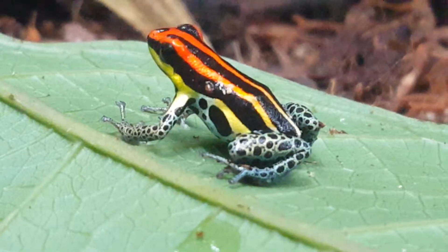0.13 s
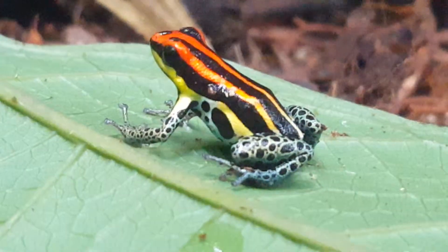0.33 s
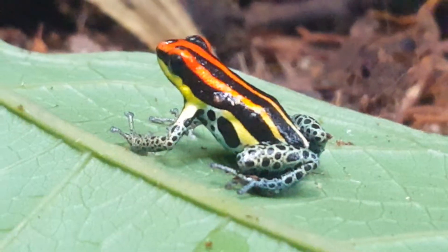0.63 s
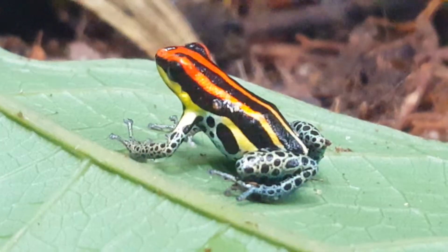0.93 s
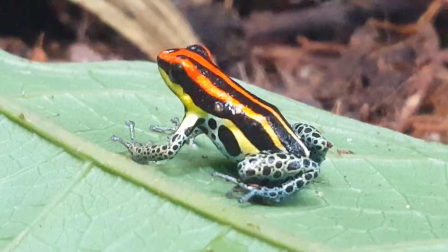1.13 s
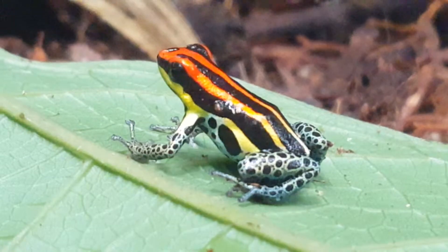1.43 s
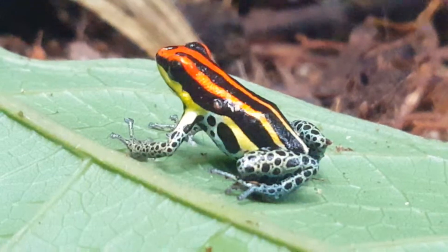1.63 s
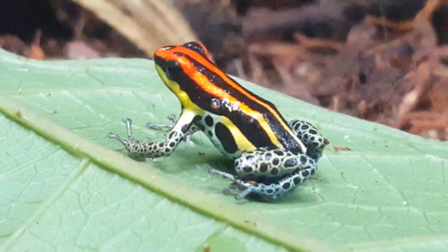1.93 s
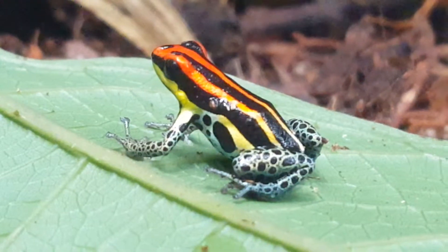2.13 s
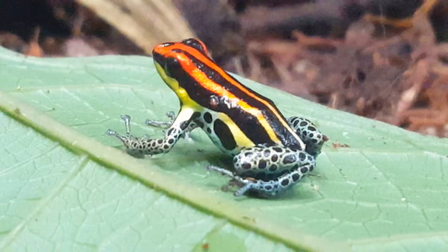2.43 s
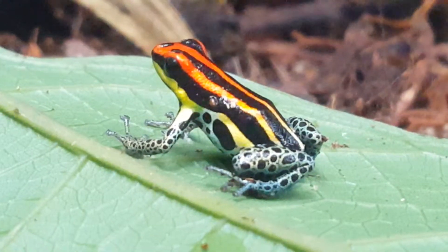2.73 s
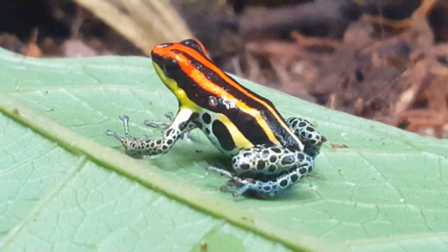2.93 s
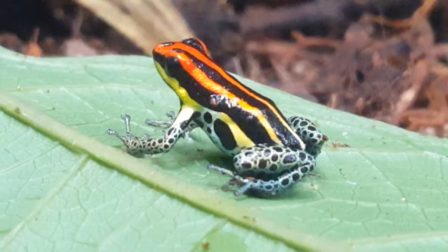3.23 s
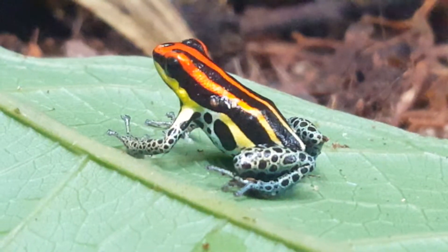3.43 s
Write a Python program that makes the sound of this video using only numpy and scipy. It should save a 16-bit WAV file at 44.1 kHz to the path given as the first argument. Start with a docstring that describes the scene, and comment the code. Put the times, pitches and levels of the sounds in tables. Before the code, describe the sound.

A cricket close on the left gives a shrill buzzing trill about once a second; two blurred distant crickets answer in the pauses, over throbbing higher insects, low breeze rumble on the right and small handling bumps.

```python
"""A humid forest, where a cricket close on the left trills once a second, each wing stroke a falling note.
Two farther ones answer, mostly in the pauses, as the same song blurred by leaves. Higher choruses of
short falling notes throb all round. A breeze, made of shaped noise, rumbles mainly on the right
microphone port and drops out twice after bumps; pulses and rough climbing tones are the small thumps
and scrapes of the handled camera."""
import sys
import numpy as np
from scipy import signal
from scipy.io import wavfile
from scipy.ndimage import uniform_filter1d

SR = 44100
rng = np.random.default_rng(int(sys.argv[2]) if len(sys.argv) > 2 else 0)


def output_pcm(signal):
    """Save a mono or channel-first signal as 16-bit PCM at the path in sys.argv[1].

    Samples are clipped to [-1, 1] before scaling.
    """
    pcm = np.clip(np.atleast_2d(signal).T, -1, 1) * 32767
    wavfile.write(sys.argv[1], SR, np.round(pcm).astype(np.int16))


def magnitude_from_level(level_db):
    """Linear magnitude for a level in decibels (20 dB per decade)."""
    exponent = np.asarray(level_db, float) / 20
    return 10 ** exponent


N = 157437  # length of the scene in samples


def evened(x):
    """Scales a sound to an average strength (rms) of 1."""
    return x / np.sqrt(np.mean(x ** 2) + 1e-20)


def slow(rate_hz, length):
    """Smooth random wander of rms 1, changing at about rate_hz: noise averaged twice."""
    width = max(int(SR / rate_hz), 1)
    once = uniform_filter1d(rng.standard_normal(length), width)
    return evened(uniform_filter1d(once, width))


def gate(t, start, end, edge_s=0.00085):
    """On between start and end, with short sloping edges."""
    return np.clip(np.minimum(t - start, end - t) / edge_s, 0, 1)


def foliage(x, t60):
    """Echoes among leaves: a random tail, unlike in each channel, that fades by 60 dB in t60 seconds."""
    t = np.arange(SR // 2) / SR
    build_up = np.minimum(t / 0.0093, 1)
    tail = rng.standard_normal((2, len(t))) * magnitude_from_level(-60 * t / t60) * build_up
    tail = tail / np.linalg.norm(tail[0])  # left tail has energy 1
    return signal.fftconvolve(np.atleast_2d(x), tail, axes=1)[:, :N]


def hiss_grid():
    """Log pitches (a column) and frame times in seconds, on which hiss() is shaped."""
    log_hz = np.log(np.fft.rfftfreq(512, 1 / SR) + 1)[:, None]
    return log_hz, np.arange(N // 128 + 5) * 128 / SR


def hiss(db):
    """Noise from random short-time spectra under db (channels, bins, frames), in dB per Hz."""
    a, b = rng.standard_normal((2, 2, N // 128 + 5, 257)).transpose(0, 1, 3, 2)
    spectra = a + 1j * b
    unit = signal.istft(spectra, nperseg=512, noverlap=384)[1].std() / np.sqrt(SR / 2)
    return signal.istft(spectra * magnitude_from_level(db), nperseg=512, noverlap=384)[1][:, :N] / unit


def air():
    """Steady forest air and recorder hiss: noise with a fixed tone colour and slight random patches."""
    # colour of the hiss: (pitch_hz, left_db_per_hz, right_db_per_hz)
    air_colour = [(25, -100, -100), (130, -96, -88), (506, -96, -98.5), (1030, -98.5, -100.5),
                  (2000, -98.5, -99), (3190, -102, -104), (4370, -105, -109), (6360, -95, -101),
                  (7900, -103, -105), (7900, -121, -121), (8300, -113, -113), (10200, -120, -120),
                  (11050, -114, -115), (11250, -109, -112), (12000, -111, -112), (16200, -115, -115)]
    patch_db = 2  # rms
    log_hz, t = hiss_grid()
    hz, left_db, right_db = np.transpose(air_colour)
    patches = uniform_filter1d(rng.standard_normal((len(t), 257)).T, 6, axis=0)
    patches = evened(uniform_filter1d(patches, 24, axis=1))
    sides = [np.interp(log_hz, np.log(hz), db) + patch_db * patches for db in (left_db, right_db)]
    return hiss(np.array(sides))


def breeze():
    """Lumpy wind pressure: low noise, unrelated between the ports, that drops away in the lulls."""
    # colour of the rumble before gusts and lulls: (pitch_hz, right_db_per_hz)
    breeze_colour = [(20, -79.5), (60, -69.5), (130, -72), (250, -77.5), (500, -82.5), (1000, -90),
                     (2000, -101), (4000, -120)]
    # lulls: (drop_s, starts_back_s, fully_back_s); the breeze returns from the top down
    lulls = [(.485, .67, .86), (1.865, 1.92, 2.08)]
    top_hz, bottom_hz, lull_db = 1500, 30, -20
    left_db, gust_db, lump_db = -14.5, .8, 1.2  # left is relative to right; gusts and lumps are rms
    log_hz, t = hiss_grid()
    lull = np.zeros((len(log_hz), len(t)))
    for drop, back, full in lulls:
        returned = np.maximum((t - back) / (full - back), 0)
        edge = np.log(top_hz) + np.log(bottom_hz / top_hz) * returned
        below_edge = 1 / (1 + np.exp(np.clip(1.8 * (log_hz - edge), -50, 50)))
        lull += np.clip((t - drop) / .012, 0, 1) * below_edge
    hz, db = np.transpose(breeze_colour)
    shape = np.interp(log_hz, np.log(hz), db, right=-150) + lull_db * lull
    rumble = hiss(np.array([shape + left_db, shape]))
    gusts = np.array([gust_db * slow(0.93, N) + lump_db * slow(79, N) for _ in range(2)])
    return rumble * magnitude_from_level(gusts)


def chorus(swells, rest_db, hz, spread_hz, right_db, count=40):
    """Many distant insects: short falling notes at random, swelling together."""
    note_s, notes_per_s, fall = 0.01305, 400, 0.075  # fall: share of the pitch lost over a note
    t, x = np.arange(round(note_s * SR)) / SR, np.zeros(N)
    for pitch in hz + spread_hz * np.linspace(-1.5, 1.5, count):
        turn = 2 * np.pi * pitch * t * (1 - fall * t / note_s / 2)
        note = np.sin(np.pi * t / note_s) * np.sin(turn)
        starts = rng.random(N) < notes_per_s / count / SR
        loudness = np.exp(-((pitch - hz) / spread_hz) ** 4 / 2)  # outlying pitches are fainter
        x += signal.oaconvolve(starts * loudness, note)[:N]
    t = np.arange(N) / SR
    level = magnitude_from_level(rest_db)
    for middle, length, db in swells:
        level = level + magnitude_from_level(db) * np.exp(-(2 * (t - middle) / length) ** 4)
    return level * evened(foliage(x, t60=0.14)) * magnitude_from_level(np.array([[0], [right_db]]))


def high_chorus():
    """A faint, higher chorus of the same kind of short falling notes."""
    # swells above the resting level: (middle_s, length_s, level_db)
    high_swells = [(.3, 0.46, -89), (1.25, 0.63, -87.5), (1.8, 0.21, -81), (2.45, 0.29, -80),
                   (3.3, 0.28, -80)]
    return chorus(high_swells, rest_db=-84, hz=9240, spread_hz=180, right_db=1.0)


def main_chorus():
    """The throbbing chorus, pitched above the near cricket, as short falling notes."""
    # swells above the resting level: (middle_s, length_s, level_db)
    main_swells = [(.03, 0.13, -58), (.33, 0.13, -55.5), (.55, 0.093, -68), (.71, 0.088, -63),
                   (1.08, 0.18, -70), (1.34, 0.19, -56.5), (1.64, 0.33, -69), (1.93, 0.12, -61.5),
                   (2.28, 0.16, -61), (2.6, 0.087, -61), (2.9, 0.25, -72), (3.15, 0.11, -64),
                   (3.38, .12, -60), (3.56, 0.13, -62)]
    return chorus(main_swells, rest_db=-64, hz=7572, spread_hz=306, right_db=-1.5)


def add(mix, s, sound, side):
    """Adds a sound to the nearer port, and faintly to the other."""
    far_port_db = -55
    away = np.clip(np.array([[1 + side], [1 - side]]) / 2, 0, 1)
    part = mix[:, round(s * SR):][:, :len(sound)]
    part += magnitude_from_level(far_port_db * away) * sound[:part.shape[1]]


def thumps():
    """Bumps on the camera body: each is one quick push and rebound."""
    # thumps: (middle_s, peak_db, pitch_hz, side from -1 left to 1 right)
    bumps = [(0.184, -33, 298, -0.84), (0.378, -36, 219, -1.15), (.424, -32.5, 322, 1),
             (0.4718, -38, 650, 0.86), (0.519, -42.5, 250, 0.86), (.549, -41.5, 348, 0.93),
             (0.5542, -44, 397, 0.96), (.615, -48, 130, 1), (0.625, -38.5, 130, 0.85),
             (1.304, -28.5, 240, -0.77), (1.832, -37, 200, 0.74), (1.8425, -34, 130, 1),
             (1.8495, -28, 125, 1), (3.554, -43, 403, -1.3)]
    cycles = .55  # time from the peak to where the pulse's outline falls to 1/e, in cycles
    out = np.zeros((2, N))
    t = np.arange(-.02, .02, 1 / SR)
    for s, db, hz, side in bumps:
        push = np.exp(-(t * hz / cycles) ** 2) * np.cos(2 * np.pi * hz * t)
        add(out, s - .02, magnitude_from_level(db) * push, side)
    return out


def scrapes():
    """Rubs on the camera body: a roughened tone whose pitch climbs, with grit in it."""
    # scrapes: (start_s, length_s, rms level_db, start_pitch_hz, side from -1 left to 1 right)
    rubs = [(0.469, 0.0147, -40.5, 700, 0.91), (.492, 0.0046, -44.5, 1010, 0.92),
            (0.498, 0.0044, -54, 1780, 0.62), (0.52, .003, -56, 1520, 0.75),
            (0.548, 0.011, -52.5, 2000, 0.84), (0.611, 0.0062, -53, 1500, 0.93),
            (0.616, 0.0066, -52.5, 1810, 0.88), (0.621, 0.0065, -53, 1390, 0.81),
            (1.844, 0.0174, -45.5, 478, 0.94), (1.858, .045, -57.5, 904, 0.87),
            (2.845, 0.0148, -51, 1291, -0.98), (3.459, 0.0057, -55.5, 930, -1),
            (3.535, 0.0028, -47, 2900, -0.87)]
    rise, rough_rate, grit_db = 2.2, 1.1, -6  # rise: end pitch / start pitch; rate x start pitch
    out = np.zeros((2, N))
    for s, length, db, hz, side in rubs:
        u = np.linspace(0, 1, max(round(length * SR), 8))  # progress through the scrape
        rough = uniform_filter1d(rng.standard_normal(3000), int(SR / (hz * rough_rate)))[:len(u)]
        grit = magnitude_from_level(grit_db) * evened(np.diff(slow(4500, 3000)))[:len(u)]
        tone = np.sin(2 * np.pi * np.cumsum(hz * rise ** u) / SR)
        outline = abs(np.sin(np.pi * u)) ** .3
        sound = outline * ((.8 + evened(rough)) * tone + grit)
        dull = signal.butter(4, min(5 * hz, 18000), fs=SR, output="sos")  # cuts the treble
        add(out, s, magnitude_from_level(db) * evened(signal.sosfilt(dull, sound)), side)
    return out


def wings(place, level, pitch=1):
    """Wing strokes: a gliding tone read from each place in the stroke cycle, with a faint octave."""
    # one wing stroke: (share of the period, pitch_hz, level_db)
    stroke = [(0, 5700, -28), (.06, 5860, -12), (.13, 5870, 1), (.27, 5840, 0), (.38, 5790, -2),
              (.5, 5720, -4), (.63, 5650, -1), (.8, 5580, -1.5), (.88, 5330, 0), (.93, 5000, -2),
              (.97, 4960, -8), (1, 4960, -28)]
    jitter, waver_hz, uneven_db = .012, 18, 2.0  # all rms; jitter in shares of a stroke
    octave_db, octave_fade_db_per_khz = -27, 5.5  # fades as the note falls from its highest pitch
    share, hz, db = np.transpose(stroke)
    place = place + jitter * slow(45, N)
    note = np.interp(place % 1, share, hz)
    turn = 2 * np.pi * np.cumsum(pitch * note + waver_hz * slow(66.8, N)) / SR
    size = level * magnitude_from_level(np.interp(place % 1, share, db) + uneven_db * slow(600, N))
    octave = magnitude_from_level(octave_db - octave_fade_db_per_khz * (hz.max() - note) / 1000)
    # the wing's own band
    band = signal.butter(3, [pitch * 4840, pitch * 6000], "bandpass", fs=SR, output="sos")
    return signal.sosfiltfilt(band, size * np.sin(turn)) + size * octave * np.sin(2 * turn)


def far_crickets():
    """Two singers of the same song, one a little higher and quicker, blurred by leaves."""
    # far trills: (start_s, end_s, level_db before blurring)
    answers = [(0.44, 0.956, -58.5), (1.295, 1.94, -55.5), (2.398, 3.012, -56.5)]
    # the singers: (pitch and speed as a multiple)
    singers = (1.06, 1.0)
    period_ms, dry_db, right_db = 19.9, -9, -9  # stroke period at speed 1
    t = np.arange(N) / SR
    level = sum(gate(t, start, end, 0.021) * magnitude_from_level(db) for start, end, db in answers)
    x = sum(wings(t * pitch * 1000 / period_ms, level, pitch) for pitch in singers)
    return (magnitude_from_level(dry_db) * x + foliage(x, t60=0.62)) * magnitude_from_level(np.array([[0], [right_db]]))


def near_cricket():
    """A lone stroke, a pause, then the trill swells; echoes beat against the falling notes."""
    # near trills: (first_stroke_end_s, end_s, stroke_period_ms, level_db before the swell and gain)
    trills = [(.0483, .558, 19.68, -40.5), (1.081, 1.579, 19.58, -40), (2.0865, 2.618, 19.68, -41),
              (3.111, 3.7, 19.64, -40.5)]
    # leaf and ground echoes, relative to the cricket: (delay_ms, left_db, right_db)
    echoes = [(2.1, -14, -24), (4.0, -14, -24), (6.7, -14, -25), (10.1, -13, -24)]
    first_s, lead_s = .013, .045  # short first stroke; how far ahead the lone stroke comes
    lead_db, swell_db, near_db = 0, 1, 0.5
    right_db, wet_left_db, wet_right_db = -27, -.5, -8
    t, place, level = np.arange(N) / SR, np.zeros(N), np.zeros(N)
    for first, end, ms, db in trills:
        lead = first - lead_s
        trill = gate(t, first - first_s, end, .004)
        lone = gate(t, lead - first_s, lead + .002, .004)
        since = np.where(trill > 0, t - first, np.where(lone > 0, t - lead, 0))
        place += since * 1000 / ms
        swell = swell_db * np.clip((t - first) / .5, 0, 1)
        level += trill * magnitude_from_level(db + swell) + lone * magnitude_from_level(db + lead_db)
    x = wings(place, level)
    taps = np.zeros((2, SR // 20))
    taps[:, 0] = 1, magnitude_from_level(right_db)
    for ms, echo_left_db, echo_right_db in echoes:
        taps[:, round(ms * SR / 1000)] = magnitude_from_level(np.array([echo_left_db, echo_right_db]))
    heard = signal.fftconvolve(x[None], taps, axes=1)[:, :N]
    dull = signal.butter(6, 5100, fs=SR, output="sos")  # leaves dull the tail above 5100 Hz
    tail = foliage(signal.sosfilt(dull, x), t60=.22)
    wet = magnitude_from_level(np.array([[wet_left_db], [wet_right_db]])) * tail
    return magnitude_from_level(near_db) * (heard + wet)


def scene():
    """All sources added together at the two ports."""
    background = air() + breeze() + high_chorus() + main_chorus()
    handling = thumps() + scrapes()
    return background + far_crickets() + handling + near_cricket()


def top_cut(x):
    """Nothing passes above the cut-off."""
    return signal.sosfilt(signal.butter(12, 15640, fs=SR, output="sos"), x)


def record(dry):
    """Microphone bass cut, then a small steady offset."""
    bass_cut = signal.butter(2, 70.7, "highpass", fs=SR, output="sos")  # corner in Hz
    finished = signal.sosfilt(bass_cut, dry) - 0.0006
    return top_cut(finished)


dry = scene()
out = record(dry)
output_pcm(out)
```